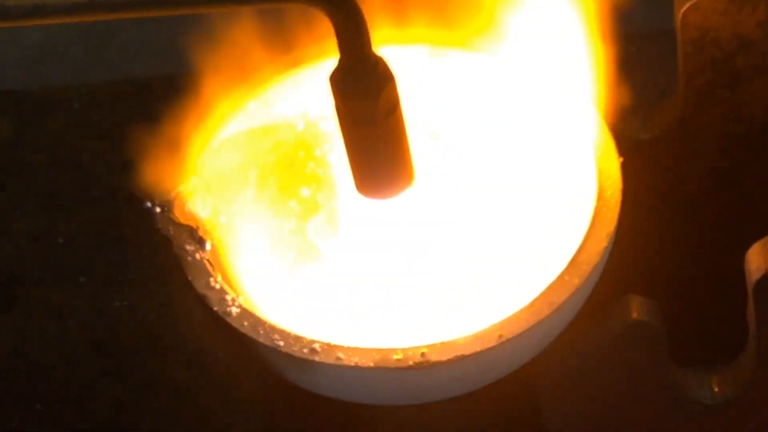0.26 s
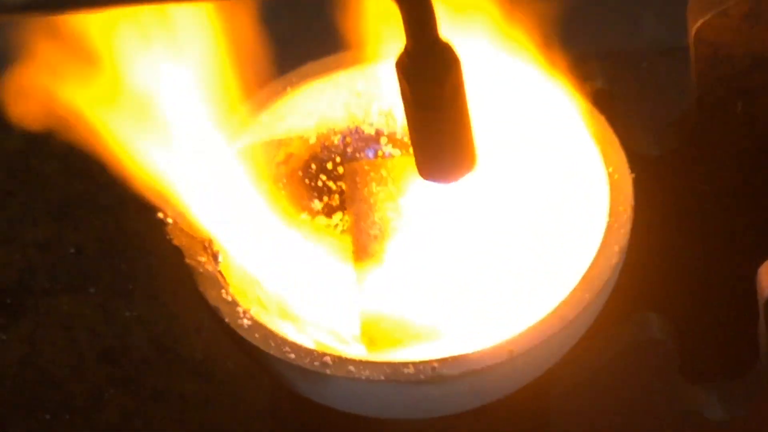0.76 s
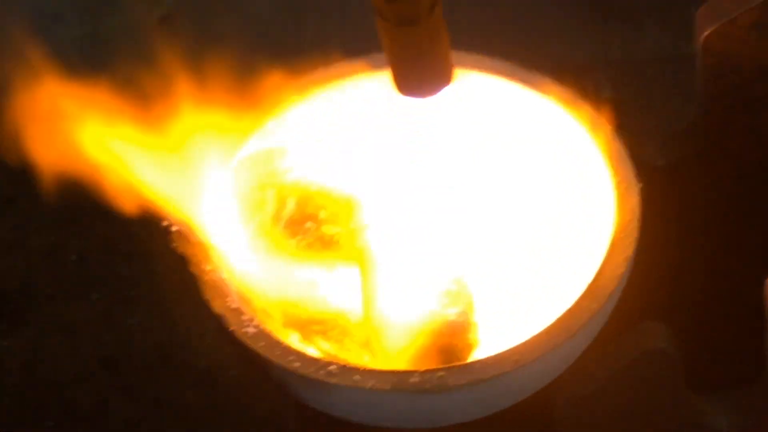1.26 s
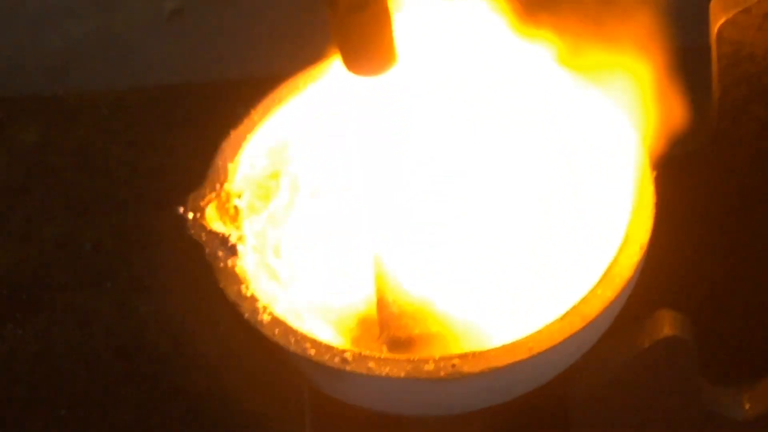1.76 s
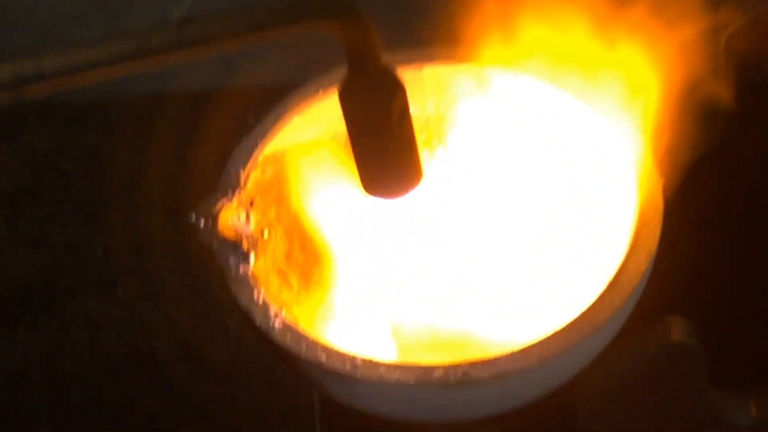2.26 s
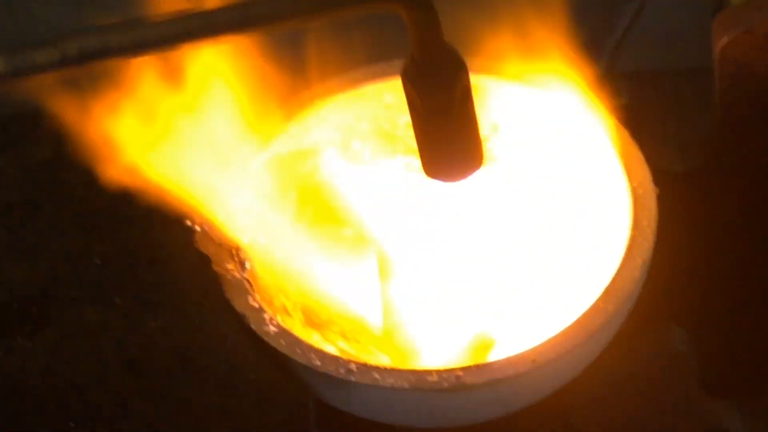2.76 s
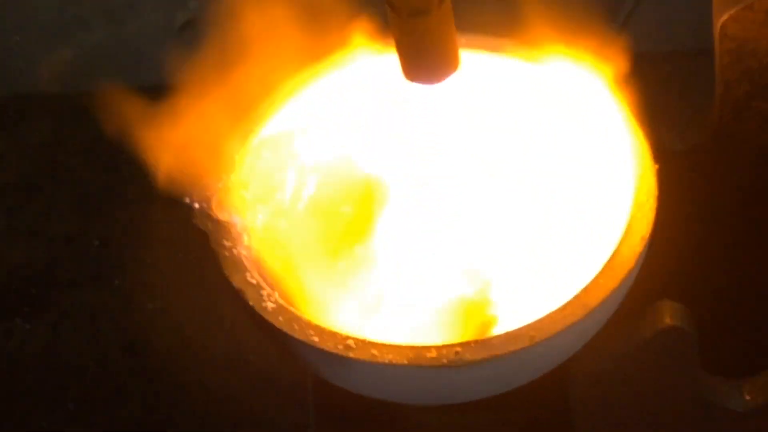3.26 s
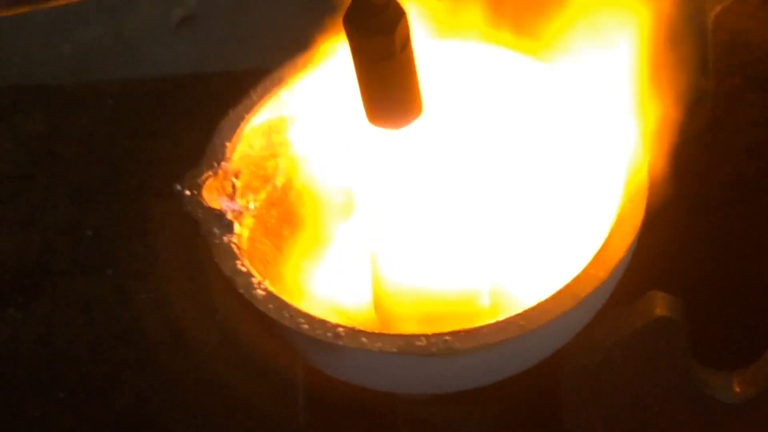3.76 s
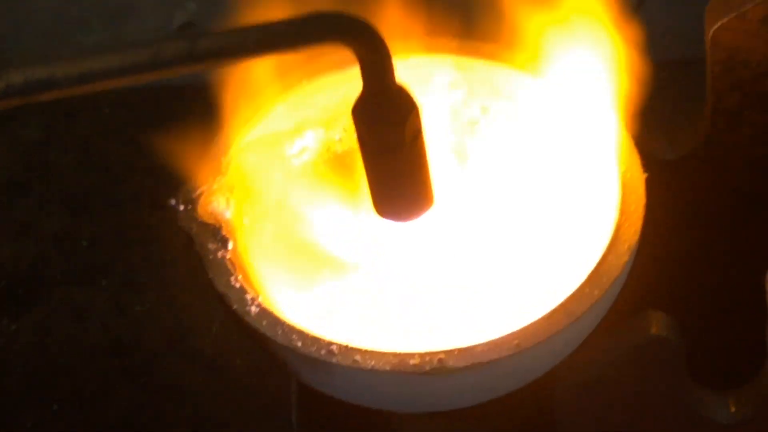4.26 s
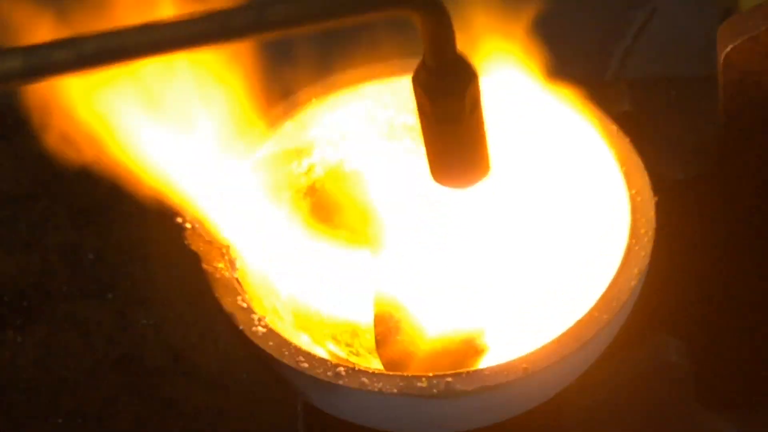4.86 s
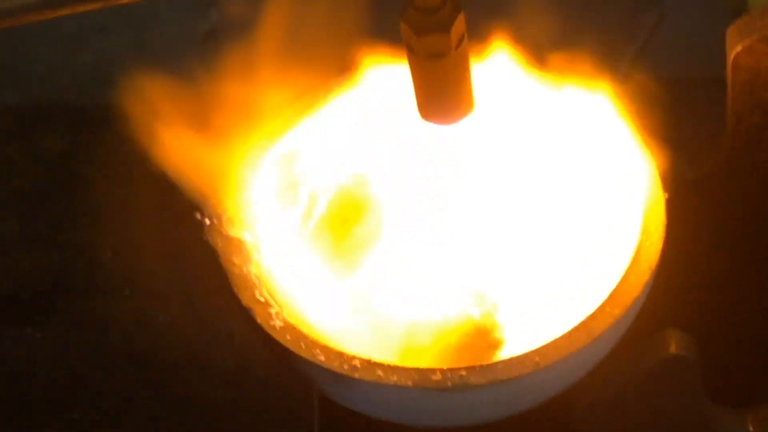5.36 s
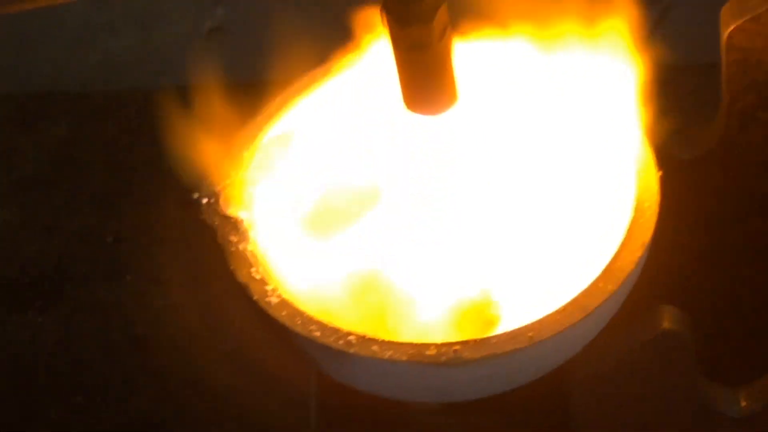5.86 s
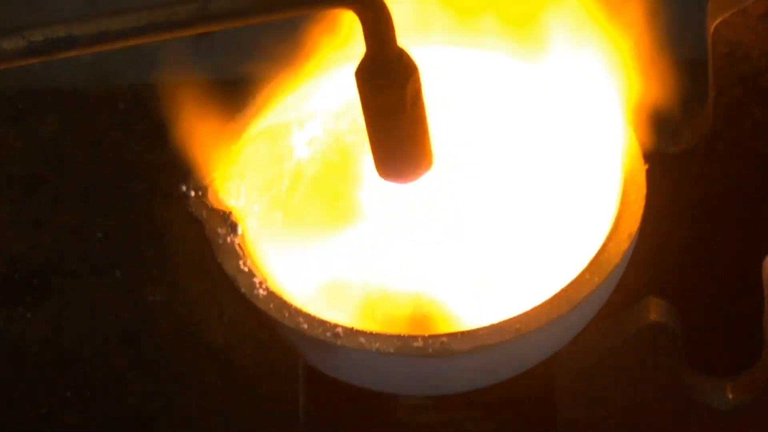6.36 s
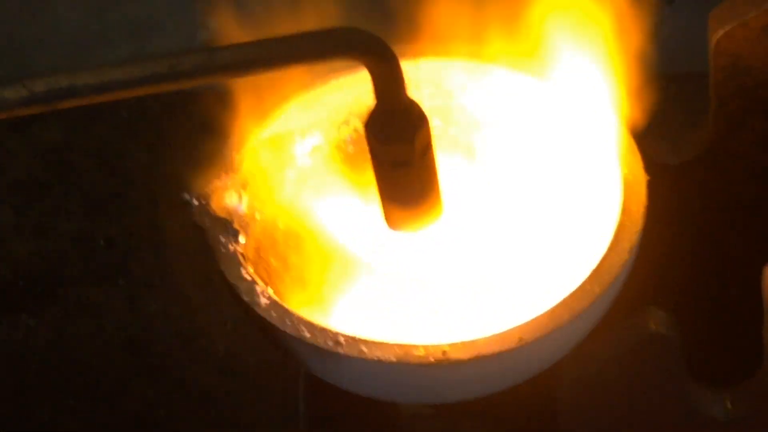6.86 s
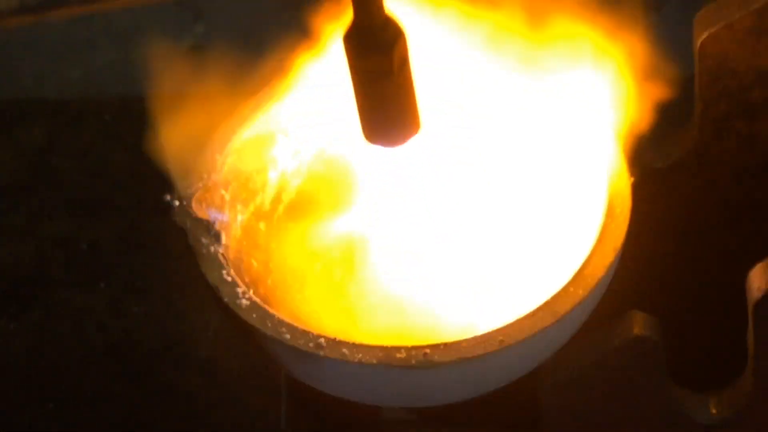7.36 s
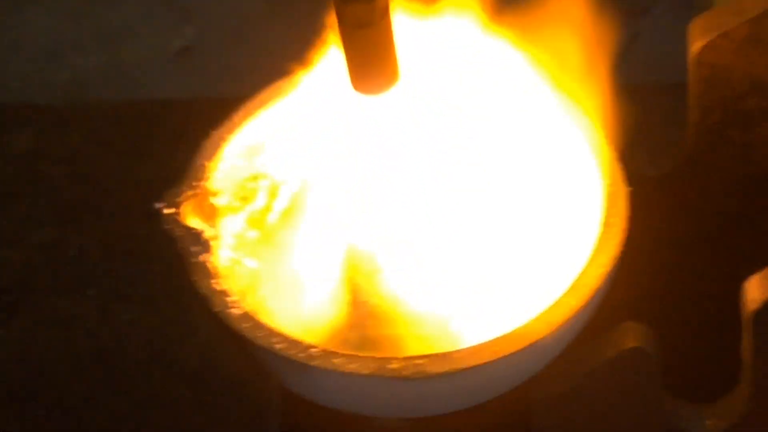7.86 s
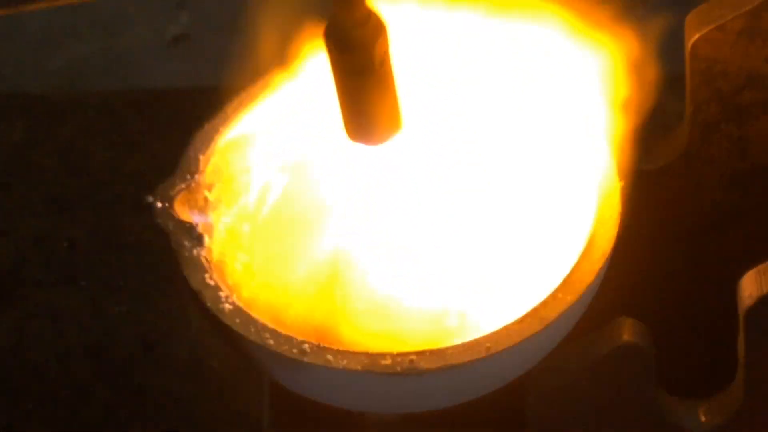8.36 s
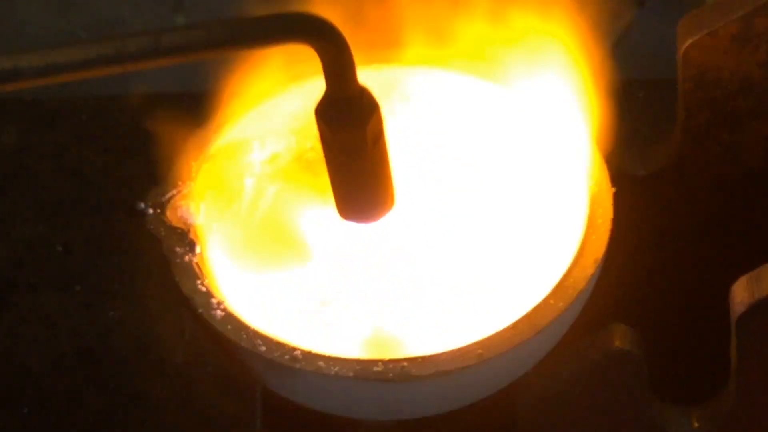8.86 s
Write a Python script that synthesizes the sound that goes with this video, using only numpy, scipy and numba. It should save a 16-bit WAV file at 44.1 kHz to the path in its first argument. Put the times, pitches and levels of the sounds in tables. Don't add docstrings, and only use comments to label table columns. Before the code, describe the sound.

A gas torch burns into a crucible, heard very close and dry through one small microphone. A bright breathy hiss and hollow mid roar run throughout, wavering quickly, their colour sliding as the nozzle circles. From 0 to 1.2 seconds hot air batters the microphone with irregular thumps, raspy tearing and sharp snaps, with a tiny flux spit near 0.2. From 1.2 to 2.2 it clears to hiss, fluttering low booms and flame slaps, with another faint spit at 1.9. Buffeting returns from 2.3 to 3.0, then eases. A longer, rougher gust fills 4.0 to 5.1, strongest near 4.2 and 4.9. Calmer flame flutters until about 6.4, when the densest battering begins, lasting to 7.6. Hiss and soft booming puffs follow, the biggest at 7.9. From 8.8 thick rumbling gusts and snaps return and continue to the end, just past 9 seconds.

```python
import sys
import numpy as np
from scipy import signal
from scipy.fft import rfft, irfft
from scipy.io import wavfile
from scipy.ndimage import uniform_filter1d
from numba import njit

SR = 44100
rng = np.random.default_rng(int(sys.argv[2]) if len(sys.argv) > 2 else 0)


def inscribe(sig):
    pcm = np.round(np.clip(np.atleast_2d(sig).T, -1, 1) * 32767)
    wavfile.write(sys.argv[1], SR, pcm.astype(np.int16))


def nominal_scale(level):
    x = np.asarray(level, float) / 20
    return 10 ** x


N = 402633

# (time [s], length [s], thump [dB], tilt of 280 Hz over 100
# Hz [dB], rasp [dB])
GUSTS = [(0.056, 0.029, -14.5, -10, -19), (0.108, 0.019, -21, -3, -26), (0.289, 0.014, -22.5, -19, -34),
         (0.316, 0.016, -17, -8, -33.5), (0.376, 0.0087, -14, -8, -14.5), (0.42, 0.019, -20.5, -2, -40),
         (0.464, 0.022, -20, -12, -21.5), (0.612, 0.019, -15, 1.5, -18), (0.66, 0.016, -28, -1, -33),
         (0.725, 0.039, -20.5, -4, -24), (0.76, 0.035, -16, 1.5, -15), (0.797, 0.041, -15.5, -4.5, -31),
         (0.863, 0.045, -15.5, 7, -26), (0.917, 0.019, -15.5, -0.5, -24), (0.956, 0.021, -21, -10, -39),
         (0.99, 0.021, -28, -1, -33), (1.186, 0.014, -16, -3.5, -21),
         (2.26, 0.035, -22, -9, -19), (2.292, 0.011, -18, 0.5, -18), (2.323, 0.044, -25, -11, -38),
          (2.379, 0.025, -15, -3.5, -21), (2.41, 0.028, -14.5, -12, -17), (2.445, 0.017, -8, -4.5, -16),
          (2.486, 0.044, -26, -6, -31), (2.77, 0.033, -27, -7, -38), (2.821, 0.01, -12, 4, -15.5),
          (2.838, 0.039, -13, 2.5, -18), (2.865, 0.039, -12.5, 5, -14.5), (2.917, 0.026, -18, 2, -44),
          (2.961, 0.053, -23, -19, -41), (3.004, 0.013, -14.5, -3, -38),
         (3.98, 0.035, -31, -8, -46), (4.069, 0.037, -35, -8, -30), (4.133, 0.027, -25, 1, -17),
          (4.167, 0.051, -10.5, 0.5, -12.5), (4.22, 0.088, -17, -3, -17), (4.331, 0.038, -18.5, -11, -30),
          (4.385, 0.032, -15.5, 1.5, -14.5), (4.436, 0.024, -16.5, -2.5, -26),
          (4.494, 0.027, -23.5, -11, -43), (4.526, 0.022, -21, -5, -40), (4.56, 0.017, -17, -2, -32),
          (4.602, 0.021, -25.5, -6, -42), (4.721, 0.013, -15.5, -7, -35), (4.75, 0.021, -16, 2, -23),
          (4.79, 0.068, -21, -9, -19.5), (4.871, 0.025, -11, 6.5, -12), (4.89, 0.062, -13, 15.5, -12.5),
          (4.989, 0.035, -17.5, 2, -24), (5.036, 0.014, -12, -1, -16), (5.086, 0.041, -30, 3, -40),
         (6.365, 0.014, -24.5, -1, -31), (6.397, 0.014, -26, -3, -39), (6.43, 0.017, -23, 5, -22.5),
          (6.469, 0.047, -15, 11, -16), (6.512, 0.033, -12, 1.5, -22), (6.546, 0.058, -13, -1, -16.5),
          (6.592, 0.048, -13, 4.5, -14), (6.637, 0.051, -19, 3, -17), (6.721, 0.038, -14, 1.5, -17),
          (6.749, 0.054, -13.5, 1.5, -15), (6.818, 0.043, -19.5, 3, -18.5), (6.867, 0.021, -19, -8, -19),
          (6.924, 0.046, -17.5, -0.5, -18), (6.996, 0.033, -18, 5, -27), (7.07, 0.057, -30, -1, -30),
          (7.133, 0.029, -20, -1, -24), (7.215, 0.07, -14, 4, -11), (7.283, 0.087, -14, 0, -15.5),
          (7.401, 0.021, -12, 8.5, -16.5), (7.458, 0.017, -17.5, 1.5, -21.5), (7.553, 0.017, -29, -3, -43),
          (7.61, 0.023, -29, -4, -25),
         (8.799, 0.028, -20, -15, -26), (8.879, 0.1, -13.5, 9, -13.5), (8.986, 0.11, -15, 1, -19),
          (9.117, 0.049, -13, 4, -23)]
EDDIES = GUSTS


def unit(x):
    return x / np.sqrt(np.mean(x ** 2))


@njit
def svf(x, hz, width):
    y, b, l = np.empty(len(x)), 0., 0.
    for i in range(len(x)):
        g = np.tan(np.pi * hz[i] / SR)
        k = np.pi * width / SR * (1 + g * g) / g
        v = (b + g * (x[i] - l)) / (1 + g * (g + k))
        b, l, y[i] = 2 * v - b, l + 2 * g * v, k * v
    return y


def walk(rate):
    k = int(SR / rate)
    held = np.repeat(rng.standard_normal(N // 20 + 1)[:N // k + 1], k)
    return 1.55 * uniform_filter1d(uniform_filter1d(held, k), k)[:N]


def band(hz, width, drift, order=1):
    centre = np.clip(hz * (1 + drift * walk(5)), 20, SR / 2.4)
    x = rng.standard_normal(N)
    for _ in range(order):
        x = svf(x, centre, 1. * width)
    return unit(x)


def curves(table):
    s, *columns = np.transpose(table)
    return [np.interp(np.arange(N) / SR, s, c) for c in columns]


def steering():
    # (time [s], hiss thrown forward [dB], depth in the bowl [steps], aim
    rounds = [
        (0.0, 3, 4, -4),
        (0.12, 2, 3, -4),
        (0.22, -2.1, 3, -0.5),
        (0.33, -1, 1, 1.5),
        (0.58, -0.5, 2.5, 3.5),
        (0.75, 0, 6.5, 1),
        (0.84, 5, 3, -3.5),
        (0.92, -0.5, 5, 0.5),
        (1.1, -4.5, -0.5, -1.5),
              (1.2, -0.4, 0.5, -1.5),
        (1.47, -1.5, 1.8, -1.3),
        (1.6, -5, 0.4, -1.4),
        (1.97, 0.3, 0.68, -0.49),
        (2.15, -3.5, 0.5, 0.22),
        (2.27, 6, 1.7, -2),
        (2.55, 1.5, 3.9, -1.4),
        (2.85, 4, 3.5, 0.96),
        (3.13, -6.5, 0.4, 0.25),
              (3.36, 1.5, -2.1, -1.2),
        (3.5, -4.5, 1.1, -1.4),
        (3.65, 0.5, -1, -0.69),
        (4.04, -0.5, -0.7, 1.1),
        (4.24, 4.5, -0.4, 0.21),
        (4.6, -4, 1.8, 2.3),
        (4.8, 6.5, 0.4, 0.76),
        (5.0, 0, 1.6, -1.1),
        (5.19, -4.5, -1.5, -1.4),
              (5.33, 3.5, -1.5, -4.5),
        (5.58, -5, -0.3, -1),
        (5.95, 0, -0.6, -1.5),
        (6.1, -6.5, -1.2, 3.5),
        (6.5, 4.5, -0.7, -1),
        (7.07, 3.5, 2.1, -2.5),
        (7.2, 6, -1, -0.3),
        (7.35, 0, -0.7, 2.5),
        (7.52, -10.5, 1, 3.5),
              (7.74, -0.5, -0.67, -1.5),
        (7.83, 6.5, -0.8, -6),
        (7.89, -1, -0.99, -2.5),
        (7.98, -4.5, -0.16, -1),
        (8.26, 1.5, -0.026, -3.5),
        (8.4, -3.5, -0.7, 1),
        (8.72, 2.5, -1.2, 0),
        (8.86, 6, -1.1, -1),
        (9.13, 5, 1, -2),
    ]
    return np.array(curves(rounds))


def cancelled(hz):
    # (time [s], length [s], centre [Hz], change [dB])
    cancels = [(0.248, 0.3, 7250, -5), (2.297, 0.48, 7200, -8.5), (3.4, 0.13, 7340, -7),
               (4.36, 0.44, 8360, -11), (5.0, 0.13, 11000, -6), (5.95, 0.42, 6500, -6), (6.02, .2, 4940, 2),
               (1.2, .35, 4050, -0.5), (.2, 0.17, 5500, 4), (6.58, 0.56, 8300, -11), (7.248, .3, 7750, -7),
               (8.4, 0.33, 6750, -12), (8.95, .2, 9200, -13), (0.0, 0.38, 8450, 8.5), (0.3, 0.37, 5600, 8),
               (2.34, 0.13, 5300, 7), (2.55, 0.29, 5880, -9), (2.7, 0.3, 9900, -16), (2.3, .35, 8540, -2),
               (4.886, 0.18, 7460, 8), (7.726, 0.19, 4960, 5), (3.9, 0.22, 5300, -9), (4.3, 0.5, 5270, 4.5),
               (.02, 0.39, 11900, 9), (.41, 0.26, 6240, -9), (1.22, 0.36, 5300, -9),
               (1.602, 0.64, 11800, 5.5), (1.86, 0.22, 4220, 1.5), (2.16, .4, 12800, -3),
               (2.58, 0.22, 14100, -8), (3.543, 0.21, 4350, 2), (3.76, 0.24, 10200, -16),
               (3.803, 0.17, 8400, 5), (3.86, 0.59, 12300, -5), (3.9, .25, 15000, 6),
               (5.18, 0.16, 8600, 8.5), (5.82, 0.26, 7500, -10), (7.41, 0.4, 8630, -4),
               (7.456, 0.2, 11150, 12.5), (7.643, 0.31, 4000, 4), (7.76, 0.17, 9500, 7),
               (8.27, 0.67, 12300, -3), (8.48, 0.36, 13300, -11), (.42, 0.32, 8900, 3.5),
               (.42, 0.32, 9700, 2.5), (4.18, 0.2, 5600, 3.5), (.5, 0.29, 4000, 3), (3.0, 0.28, 11000, 3),
               (8.0, .25, 6060, -2)]
    width_hz, fade_s = 550, .07
    t = np.arange(0, N, 64) / SR
    change_db = 0
    for s, length, centre_hz, db in cancels:
        inside = length / 2 - abs(t - s - length / 2)
        fade = np.clip(inside / fade_s + .5, 0, 1)
        change_db = change_db + db * np.exp(-((hz - centre_hz) / width_hz) ** 2) * fade
    return np.repeat(change_db, 64)[:N]


def jet(gust):
    # (centre [Hz], level of one strand [dB])
    lobes = np.array([(5400, -7.5), (7000, -7), (9000, -8.5), (11800, -11), (15000, -14.5)])
    # (level [dB], throw [dB/dB], depth [dB/step], aim [dB/step])
    response = np.array([(-32, 0.52, 2.5, -0.73), (-29, 1.35, 1.83, 0.5), (-24.5, 1.54, 1.25, 2),
                         (-24, 1.65, -0.5, 0.94), (-24, 0.65, 0.5, 0.4)])
    lobe_db = response[:, 1:] @ steering() + response[:, :1] + lobes[:, 1:]
    flutter_db = .7 * gust + .55 * walk(60)
    hiss = 0
    for hz in np.arange(4900, 15400, 400):
        place = np.interp(hz, lobes[:, 0], np.arange(len(lobes)))
        k = min(int(place), len(lobes) - 2)
        steered_db = lobe_db[k] + (place - k) * (lobe_db[k + 1] - lobe_db[k])
        strand_db = steered_db + cancelled(hz) + 1.4 * walk(9) + 1.8 * walk(30)
        hiss = hiss + nominal_scale(strand_db) * band(hz, 600, .008, order=2)
    thrown = signal.butter(8, 4650, "high", fs=SR, output="sos")
    return nominal_scale(flutter_db) * signal.sosfilt(thrown, hiss)


def flares(rows, from_db, rise_s, fall_s):
    t = np.arange(0, N, 16) / SR
    gain_db = 0
    for s, db in rows:
        shape = np.exp(np.minimum((t - s) / rise_s - 1, (s + rise_s - t) / fall_s))
        gain_db = gain_db + max(db - from_db, 0) * shape
    return np.repeat(gain_db, 16)[:N]


def wake():
    spread_s = 0.041
    t = np.arange(0, N, 64) / SR
    power = 0
    for s, length, db, *_ in EDDIES:
        power = power + nominal_scale(2 * db) * np.exp(-((t - s - length / 2) / (spread_s + length / 2)) ** 4)
    return np.repeat(power, 64)[:N]


def boom():
    # (centre [Hz], width [Hz], level [dB])
    low_modes = [(214, 130, -2), (392, 66, -15), (127, 68, -23)]
    # (time [s], level [dB])
    body = [(0.0, -44), (0.33, -44), (0.84, -34), (1.05, -42.5), (1.5, -27.5), (2.11, -34), (2.59, -36),
            (3.15, -34.5), (4.04, -30.5), (4.58, -37.5), (5.14, -42), (5.31, -33.5), (6.2, -31), (6.4, -43),
            (7.6, -40), (8.05, -29), (8.62, -33), (9.13, -37)]
    # (time [s], peak [dB])
    catches = [(1.288, -24), (1.359, -23), (1.597, -27), (1.67, -25), (1.841, -21), (2.007, -20),
               (2.162, -20), (3.178, -29), (3.3, -21), (3.458, -28), (3.619, -23), (3.671, -24),
               (3.821, -22), (5.47, -28), (5.615, -25), (5.775, -19), (5.918, -24), (5.992, -22),
               (6.162, -27), (6.232, -26), (7.909, -15), (7.964, -22), (8.114, -20.5), (8.231, -22),
               (8.353, -27), (8.444, -25), (8.56, -24), (8.731, -19)]
    level_db = curves(body)[0] + flares(catches, from_db=-26.5, rise_s=0.0043, fall_s=0.015)
    sound = sum(nominal_scale(db + 1.0 * walk(6.9)) * band(hz, width, 0.014, order=2) for hz, width, db in low_modes)
    return nominal_scale(level_db) * unit(sound)


def roar_and_edge():
    # (centre [Hz], width [Hz], level [dB])
    mid_modes = [(739, 263, 3), (970, 640, 5), (1449, 245, 2), (1808, 420, 7), (2060, 370, -1),
                 (2310, 990, 5.5), (2547, 48, -2)]
    # (time [s], peak [dB])
    licks = [(1.352, -17), (1.404, -20), (1.77, -13), (1.874, -16), (1.902, -13), (2.163, -20),
             (3.286, -21), (3.443, -13), (3.459, -11), (3.585, -24), (3.61, -12), (3.723, -12),
             (3.825, -22), (5.219, -9), (5.239, -9), (5.346, -15), (5.382, -12), (5.491, -11.5),
             (5.676, -17), (5.806, -11), (6.169, -20), (7.619, -12), (7.805, -19), (7.999, -15),
             (8.236, -12.5), (8.688, -16)]
    throw_db, depth, _ = steering()
    slap_db = flares(licks, from_db=-21.5, rise_s=0.0017, fall_s=0.0065)
    roar_db = -28 + 0.5 * throw_db + slap_db
    edge_db = -31 + 0.73 * throw_db - 0.03 * depth + 0.75 * slap_db
    roar = 0
    for hz, width, db in mid_modes:
        roar = roar + nominal_scale(db + .6 * walk(6) + 1.3 * walk(20)) * band(hz, width, .025, order=2)
    edge = 0
    for hz in (2853, 3400, 3924, 4447):
        strand_db = cancelled(hz) + 0.21 * walk(14) + 0.43 * walk(25)
        edge = edge + nominal_scale(strand_db) * band(hz, 484, 0.039, order=2)
    return nominal_scale(roar_db) * unit(roar) + nominal_scale(edge_db) * unit(edge)


def flame(gust):
    lick_db = .6 * gust + 1.0 * walk(40)
    return nominal_scale(lick_db) * (boom() + roar_and_edge())


def draught():
    still_db, wake_db = -44.5, -20.5
    level_db = 10 * np.log10(nominal_scale(2 * still_db) + nominal_scale(2 * wake_db) * wake())
    return nominal_scale(level_db + 2 * walk(30)) * band(80, 110, .15, order=2)


def eddy_body(t, s, length):
    rise = 1 / (1 + np.exp((s + 0.001 - t) / (0.001 + .02 * length)))
    fall = 1 + np.exp((t - s - length + .003) / (.003 + 0.044 * length))
    return rise / fall * np.clip(length / .035, .1, 1) ** 2


def kick_swing(u, tilt_db):
    rest_hz = 95 * 2 ** (tilt_db / 11)
    turns = rest_hz * u + 0.9 * (1 - np.exp(-u / 0.0024))
    return np.sin(2 * np.pi * turns) * np.exp(-u / 0.011)


def torn_air(power):
    # (frequency [Hz], density [dB/Hz])
    spectrum = np.array([(240, -45), (400, -6), (509, 1), (607, 3), (1960, -7), (4320, -16), (5500, -19.5),
                         (7150, -43), (12100, -120)])
    hz = np.maximum(np.fft.rfftfreq(N, 1 / SR), 1)
    colour = nominal_scale(np.interp(np.log(hz), np.log(spectrum[:, 0]), spectrum[:, 1]))
    torn = unit(irfft(rfft(nominal_scale(3.3 * walk(250)) * rng.standard_normal(N)) * colour, N))
    coarse = signal.sosfilt(signal.butter(2, 1300, fs=SR, output="sos"), torn)
    fineness = np.clip(uniform_filter1d(power, 1300) / nominal_scale(-40), 0, 2.5) ** .4
    return np.sqrt(power) * (coarse + (torn - coarse) * fineness)


def eddies():
    # (time [s], length [s], thump [dB],
    # tilt of 280 Hz over 100 Hz [dB], rasp [dB])
    flaps = [(0.128, .014, -27, 0, -26), (2.589, 0.015, -13, -4.5, -19), (2.674, 0.015, -18.5, -0.5, -24),
             (6.676, .014, -14, 2, -22), (6.696, 0.015, -14, 1, -25), (6.878, .014, -22, 2, -29),
             (4.302, 0.013, -17, 3, -19), (4.243, .014, -16, 2, -18), (2.525, .014, -27, -3, -34),
             (2.936, 0.013, -18, 7, -24), (6.797, .012, -13, 4, -26)]
    t, u = np.arange(N) / SR, np.arange(2600) / SR
    kicks, deep, full, tight, rasp = np.zeros((5, N + 5200))
    rows = EDDIES + flaps
    gaps, sizes = rng.exponential(size=(len(rows), 12)), rng.standard_normal((len(rows), 12))
    sizes[:, 0] = np.sign(sizes[:, 0]) * 0.5
    for (s, length, thump_db, tilt_db, rasp_db), gap, size in zip(rows, gaps, sizes):
        i = slice(max(int((s - .03) * SR), 0), min(int((s + length + .06) * SR), N))
        body = eddy_body(t[i], s, length)
        thump = body * nominal_scale(2 * thump_db)
        share = 1 / (1 + nominal_scale(-2 * tilt_db))
        small = np.clip(tilt_db / 33, 0, 1)
        deep[i] += thump * (1 - share)
        full[i] += thump * share * (1 - small)
        tight[i] += thump * share * small
        rasp[i] += body * nominal_scale(2 * (rasp_db - 3.0))
        swing = kick_swing(u, tilt_db)
        later = np.append(0, np.cumsum(.008 + .009 * gap[1:]))
        for after, luck in zip(later[later <= max(length - .018, 0)], size):
            inner = after > 0 or length > .04
            j = int((s + 0.00522 + after) * SR)
            kick_db = thump_db + 5.5 + 1.7 * luck - 3 * inner
            tear_db = rasp_db + 5.5 + 1.0 * luck - 7 * inner
            kicks[j:j + len(u)] += np.sign(luck) * nominal_scale(kick_db) * swing
            rasp[j:j + len(u)] += nominal_scale(2 * tear_db) * np.exp(-u / 0.0022)
    rasp[:N] += nominal_scale(2 * (-32 + 3.7 * walk(40))) * wake()
    low = unit(np.tanh(0.69 * band(71, 110, 0.072, order=2)))
    mid = unit(np.tanh(2.3 * band(220.4, 350, 0.4, order=2)))
    high = unit(np.tanh(1.5 * band(377, 310, 0.24, order=2)))
    buffet = np.sqrt(deep[:N]) * low + np.sqrt(full[:N]) * mid + np.sqrt(tight[:N]) * high
    return kicks[:N] + nominal_scale(1.5) * buffet + torn_air(rasp[:N])


def snaps():
    # (time [s], peak [dB])
    fronts = [(0.069, -4), (0.132, -8), (0.194, -16), (0.381, -10), (0.422, -19), (0.466, -9), (0.614, -8),
              (0.657, -17), (0.748, -9), (0.859, -7), (0.873, -2), (0.969, -14), (1.188, -12), (2.271, -6),
              (2.297, -9), (2.38, -10), (2.449, -7), (2.55, -16), (2.593, -5), (2.644, -15), (2.824, -4),
              (2.963, -15), (2.995, -13), (4.139, -7), (4.17, -2), (4.186, -3), (4.391, -2), (4.44, -13),
              (4.565, -10), (4.72, -9), (4.751, -5), (4.873, -3), (4.992, -12), (5.039, -9), (6.437, -11),
              (6.466, 1), (6.515, -4), (6.603, -3), (6.721, -7), (6.827, -9), (6.877, -10), (6.93, -7),
              (7.133, -6), (7.216, -1), (7.405, -4), (7.446, -16), (7.464, -10), (8.885, -2), (9.033, -3),
              (9.057, -5)]
    from_hz, to_hz, decay_s = 2690, 445, 0.0014
    out, t = np.zeros(N + 600), np.arange(600) / SR
    for (s, db), (side, size) in zip(fronts, rng.standard_normal((len(fronts), 2))):
        drop_s = nominal_scale(2 * size) * 0.00051
        turns = to_hz * t + (from_hz - to_hz) * drop_s * (1 - np.exp(-t / 0.00045))
        envelope = np.exp(-t / decay_s) * (1 - np.exp(-t / .0004))
        i = int(s * SR)
        out[i:i + len(t)] += np.sign(side) * nominal_scale(db - 1) * np.sin(2 * np.pi * turns) * envelope
    return out[:N]


def pops():
    # (time [s], peak [dB], pitch [Hz])
    spits = [
        (0.195, -13, 930),
        (1.902, -15, 1730),
    ]
    out, t = np.zeros(N), np.arange(800) / SR
    for s, db, hz in spits:
        i = int(s * SR)
        out[i:i + len(t)] += nominal_scale(db) * np.sin(2 * np.pi * hz * t) * np.exp(-t / 0.002)
    return out


def bench(x, reach_ms, share):
    out, power = x, 1
    for _ in range(3):
        taps = np.zeros(int(reach_ms * SR / 1000) + 1)
        taps[rng.integers(20, len(taps), size=9)] = rng.choice([-1., 1.], size=9) / 3
        weight = share * walk(7.0)
        out = out + weight * signal.oaconvolve(x, taps)[:N]
        power = power + weight ** 2
    return out / np.sqrt(power)


def housing(air):
    # (centre [Hz], width [Hz], depth [0-1])
    notches = [(8040, 310, 0.42)]
    for hz, width, depth in notches:
        air = air - min(depth, 1) * svf(air, hz * (1 + .015 * walk(3)), 1. * width)
    return air


def rim_echoes(air):
    # (time [s], near rim [Hz], near depth [0-1], far rim [Hz], far depth [0-1])
    rims = [(0.0, 3700, 0.1, 4300, 0.3), (.5, 3780, 0.7, 4400, 0.8), (1.05, 3460, 0.7, 4720, .9),
            (1.35, 3320, .95, 4470, 0.1), (1.9, 2820, .8, 4900, 0.1), (2.2, 3570, 0.7, 4560, 0.8),
            (2.8, 3400, 0.1, 4360, 0.7), (3.2, 3350, .85, 4420, .9), (3.6, 3100, 0.7, 4860, 0.2),
            (4.0, 3220, .7, 4570, .8), (4.6, 3700, 0, 4460, 0.8), (5.15, 3220, 0, 4500, 0.4),
            (5.6, 3100, 0.8, 4700, 0), (6.2, 3420, 0.24, 4570, 0.8), (7.0, 3300, .2, 4400, 0.9),
            (7.55, 3300, 0.4, 4480, .9), (7.9, 3150, 0.4, 4400, 0), (8.6, 3130, 0.2, 4430, 0.5)]
    # (near rim [Hz], far rim [Hz])
    widths_hz = (470, 350)
    near_hz, near, far_hz, far = curves(rims)
    for hz, depth, width in zip((near_hz, far_hz), (near, far), widths_hz):
        air = air - np.clip(depth, 0, 1) * svf(air, hz * (1 + 0.0065 * walk(3.9)), 1. * width)
    return air


def scene():
    gust = walk(16)
    torch = jet(gust) + flame(gust) + draught()
    air = bench(torch, reach_ms=9, share=0.2) + pops()
    air = rim_echoes(housing(air))
    return np.tile(air + eddies() + snaps(), (2, 1))


def band_limit(x):
    return signal.sosfilt(signal.butter(12, 15330, fs=SR, output="sos"), x)


def record(dry):
    x = signal.sosfilt(signal.butter(2, 52, "high", fs=SR, output="sos"), dry)
    mix = x / (1 + (x / .93) ** 4) ** .25
    return band_limit(mix)


dry = scene()
out = record(dry)
inscribe(out)
```